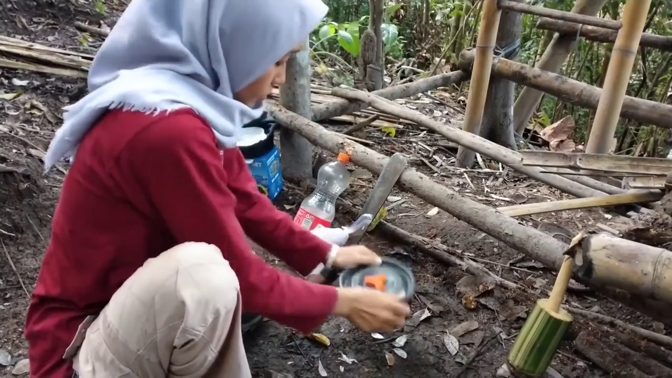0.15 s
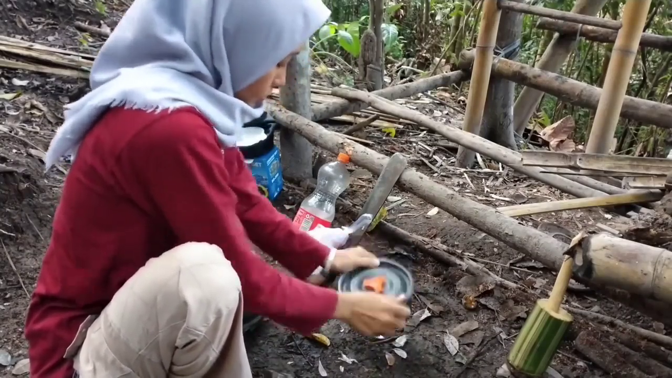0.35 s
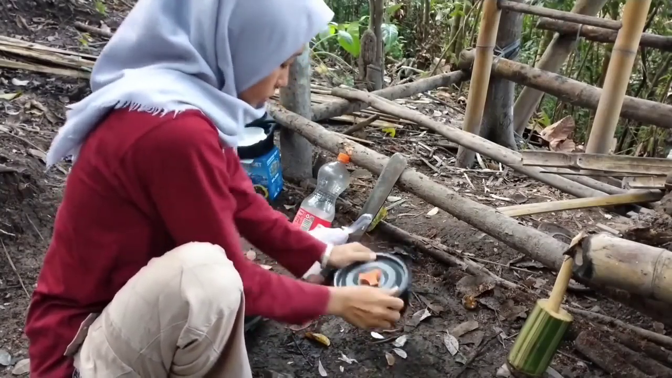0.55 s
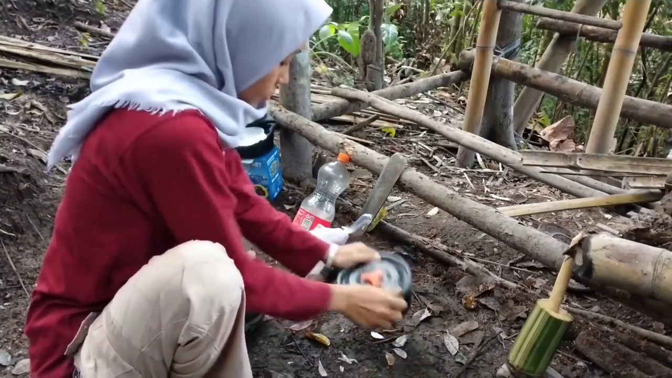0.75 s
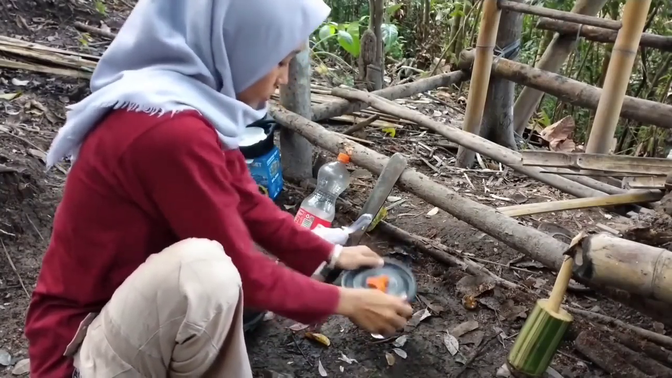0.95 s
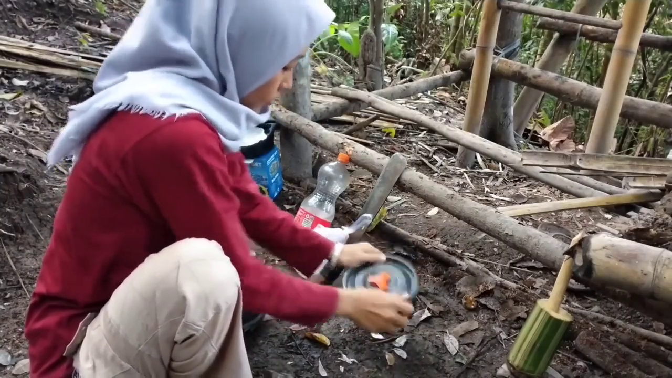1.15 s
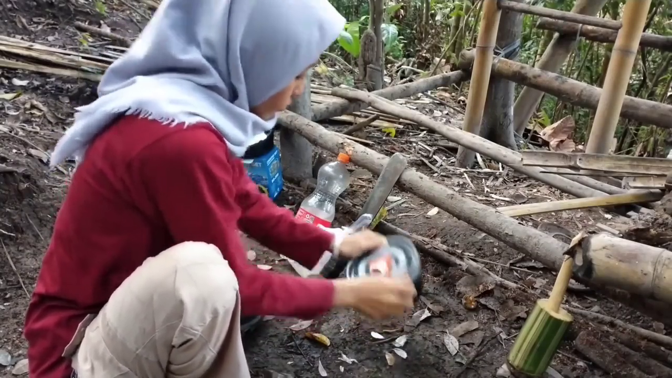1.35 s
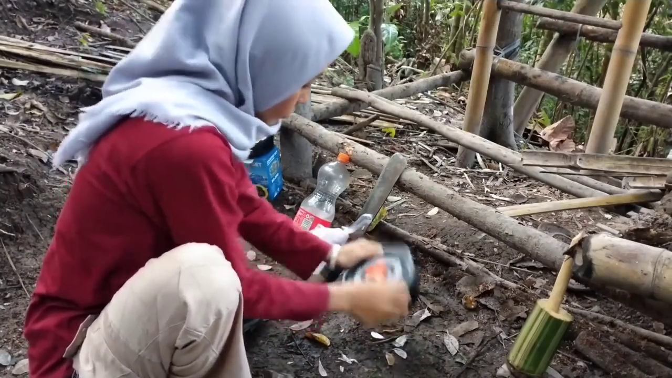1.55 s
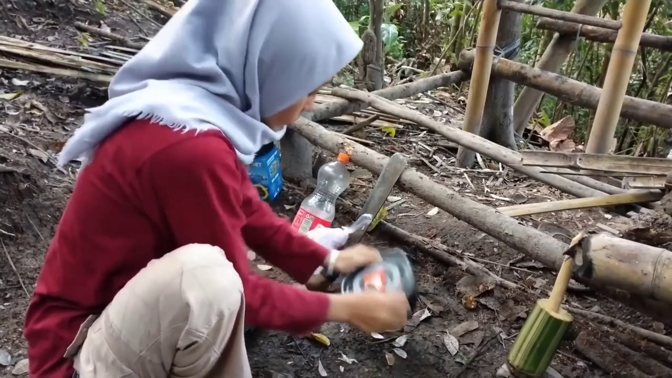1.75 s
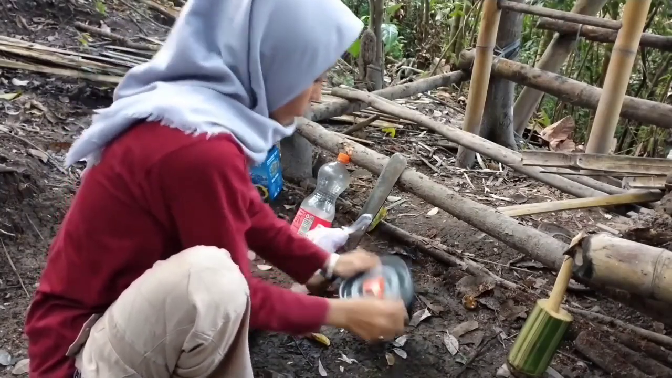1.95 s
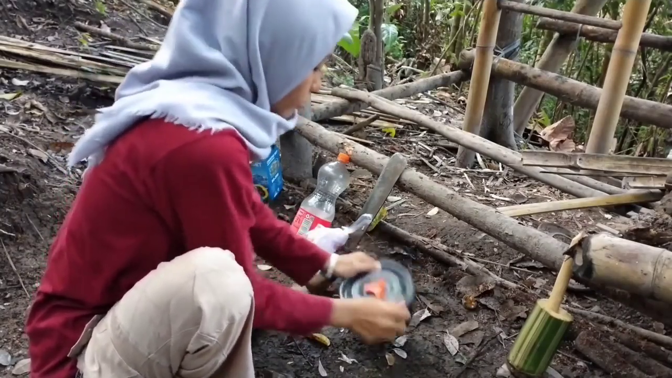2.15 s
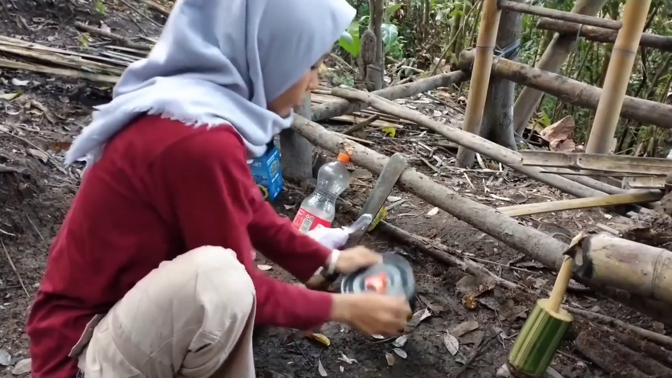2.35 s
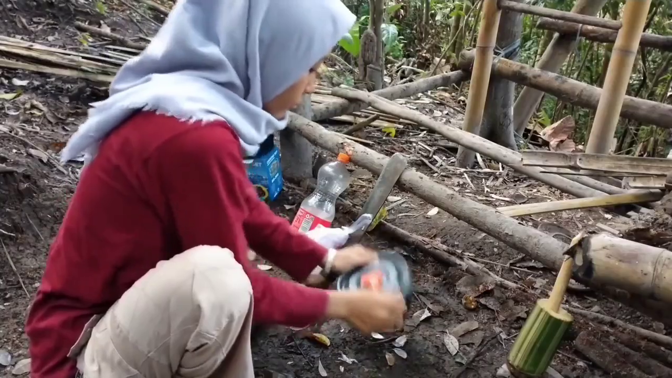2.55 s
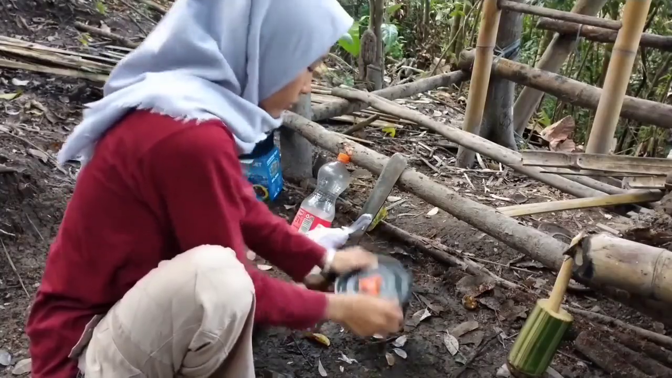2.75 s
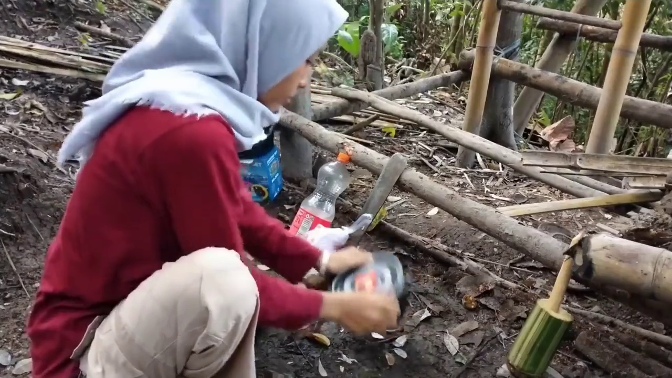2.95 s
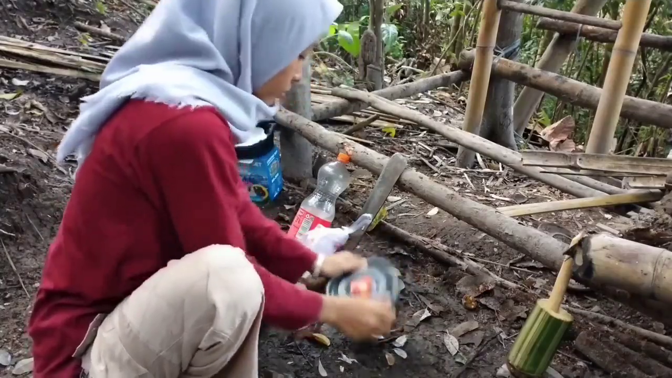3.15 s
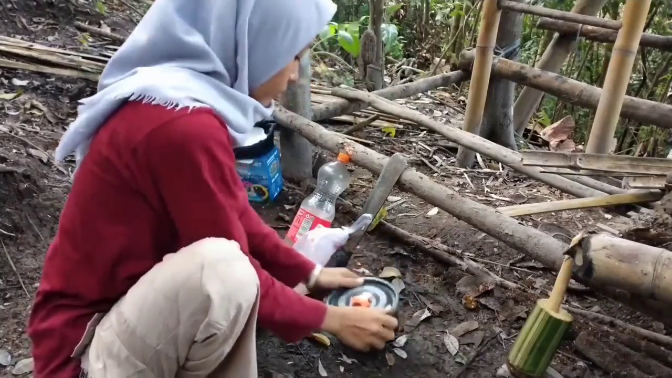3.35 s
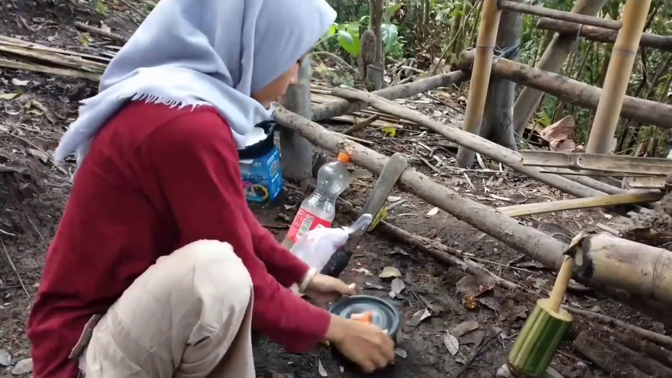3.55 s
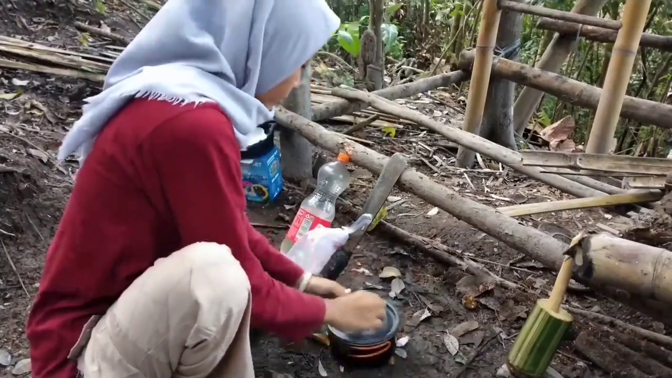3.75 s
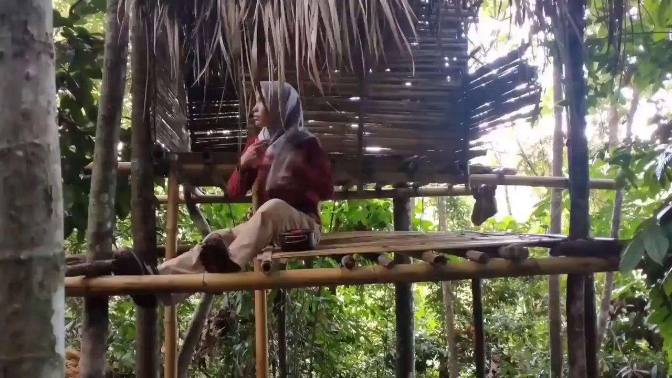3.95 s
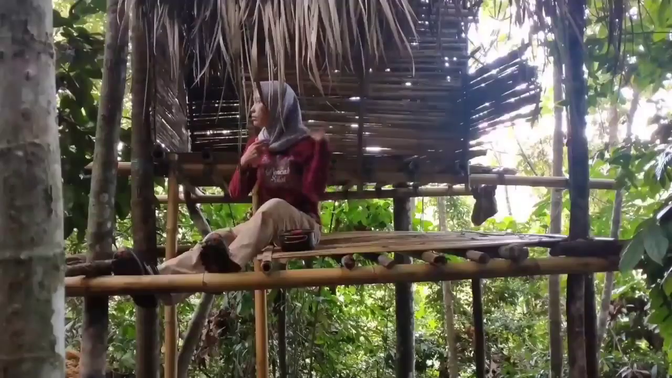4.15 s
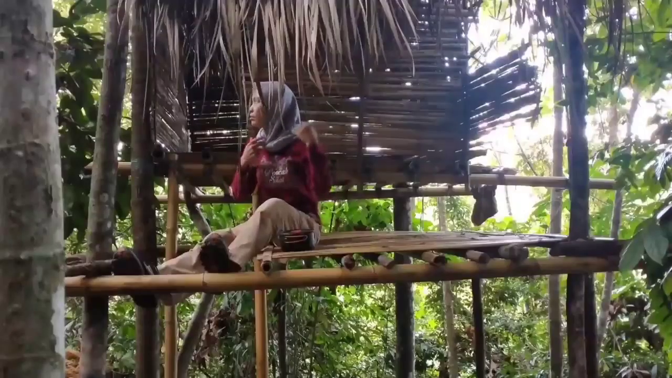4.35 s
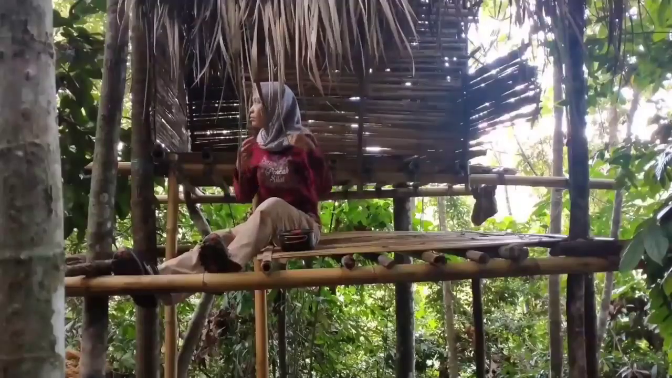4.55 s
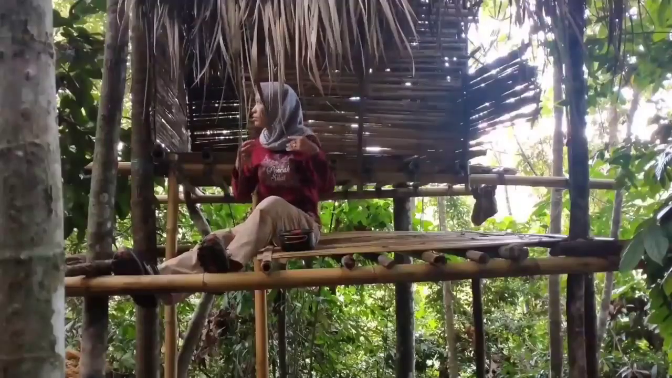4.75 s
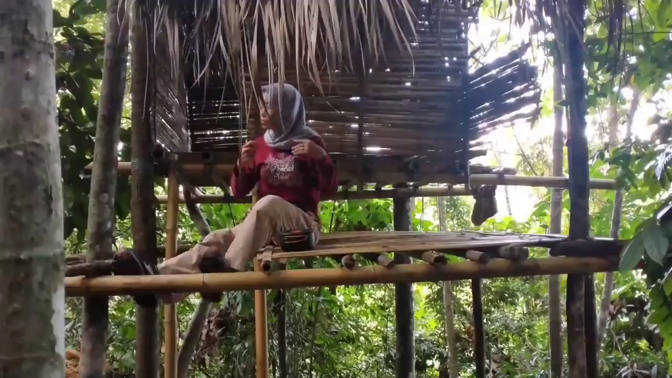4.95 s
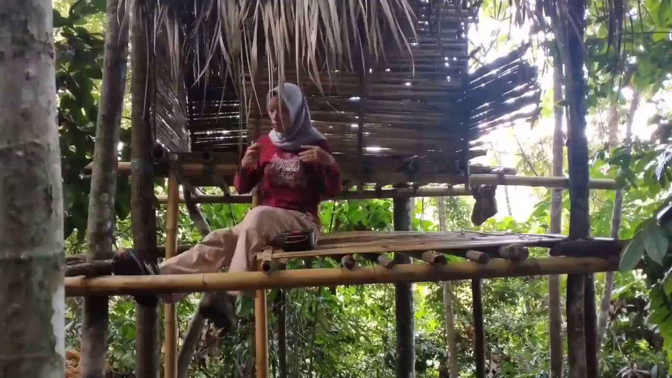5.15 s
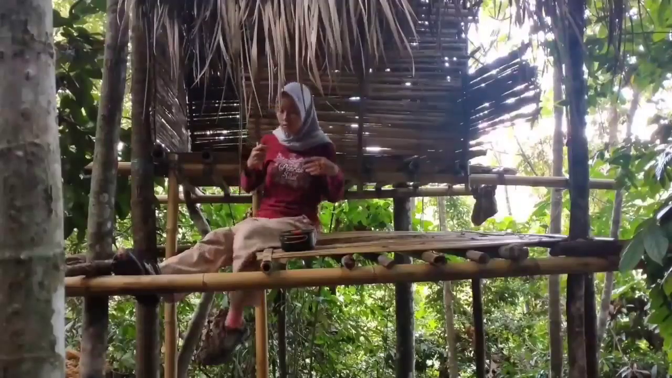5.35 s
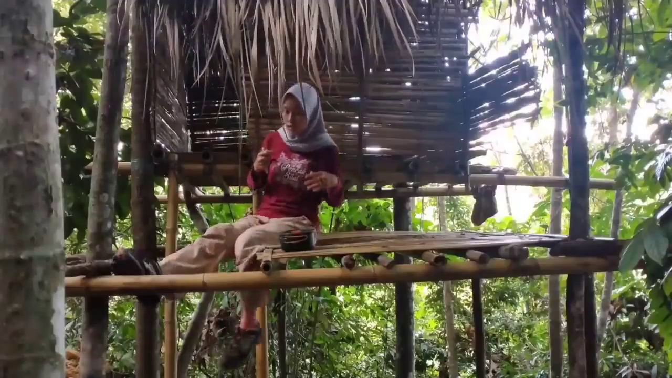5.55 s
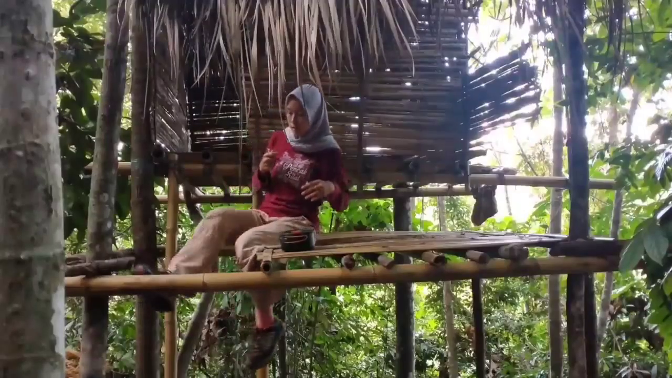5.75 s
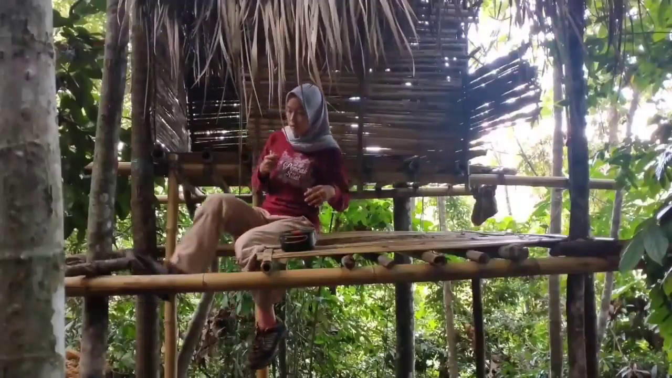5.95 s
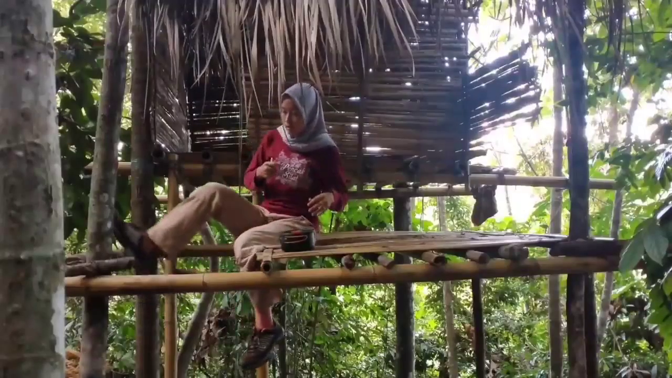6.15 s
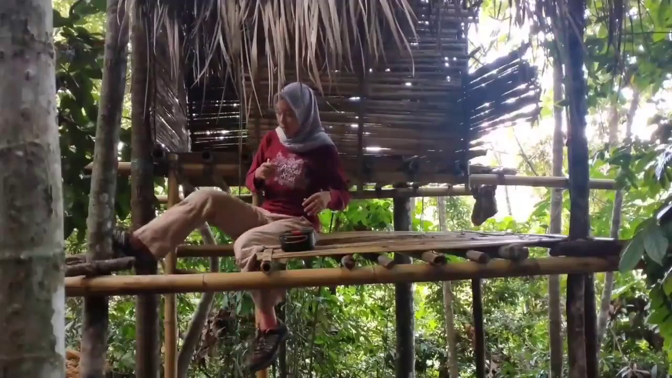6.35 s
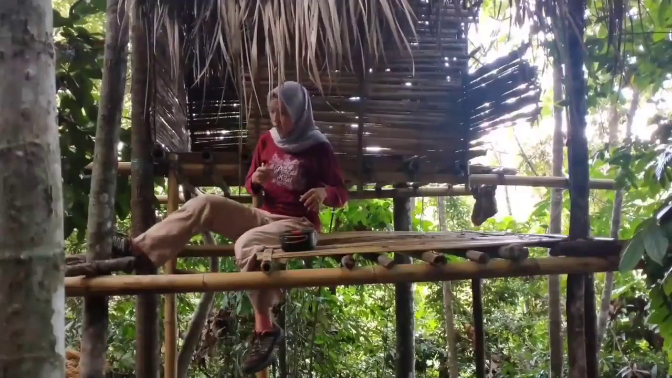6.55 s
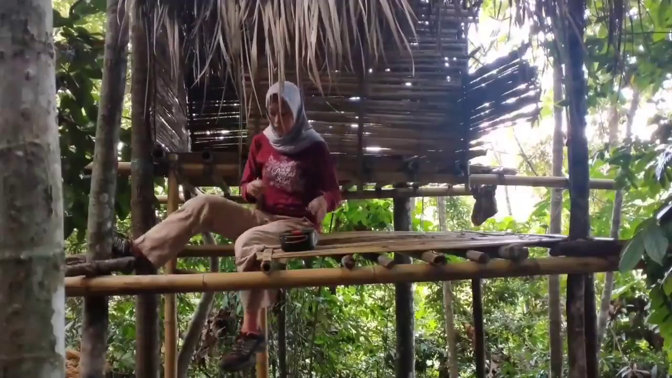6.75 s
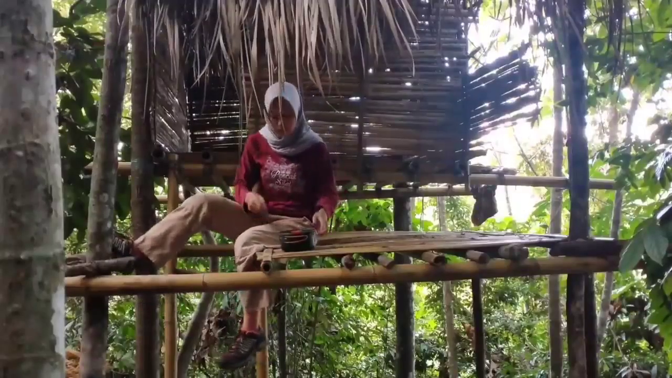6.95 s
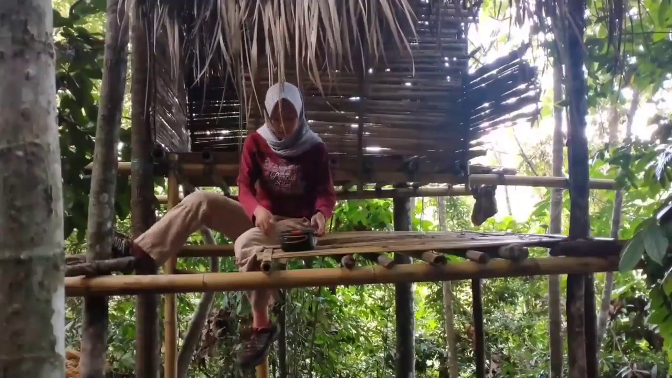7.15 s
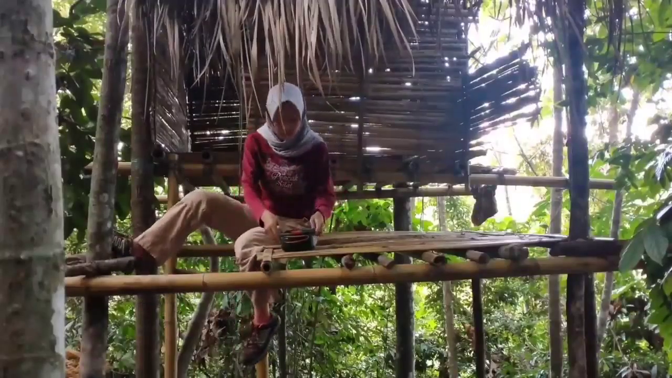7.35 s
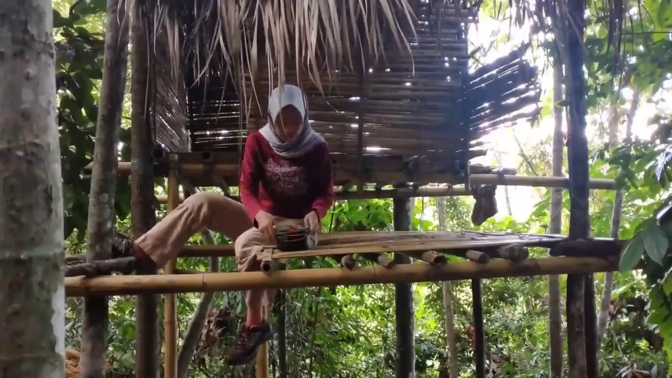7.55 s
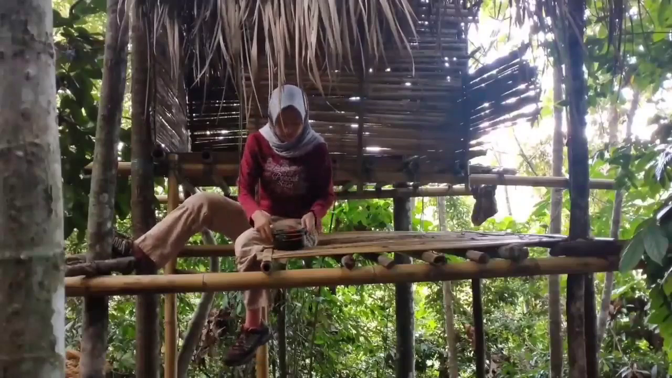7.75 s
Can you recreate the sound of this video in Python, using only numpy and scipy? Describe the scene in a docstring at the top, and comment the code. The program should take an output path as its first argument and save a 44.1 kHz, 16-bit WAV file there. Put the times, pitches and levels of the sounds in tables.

```python
"""Shaken metal pot in a cicada forest

Pieces of food strike the wall of a hand-held pot, ringing damped modes amid noise patter; the pot is then set down.
A bamboo floor knocks (sine plus noise puff) and creaks (slip rate with overtones).
Cicadas whine (three climbing sines) and buzz (lines of paired clicks); high chips are narrow noise bursts.
Bands of noise make a far shrill chorus, an insect haze, hissing leaves and a low rumble that steps down once."""
import sys
import numpy as np
from scipy import signal
from scipy.fft import rfft, irfft, next_fast_len
from scipy.io import wavfile
from scipy.ndimage import map_coordinates

SR = 44100
rng = np.random.default_rng(int(sys.argv[2]) if len(sys.argv) > 2 else 0)


def put_to_file(sound):
    """Save the sound as 16-bit audio at rate SR, in the file named by the first command-line argument."""
    columns = np.atleast_2d(sound).T  # one column per channel
    safe = np.clip(columns, -1, 1)
    whole_steps = np.round(safe * 32767)
    wavfile.write(sys.argv[1], SR, whole_steps.astype(np.int16))


N = 348373


def amp(db):
    """Amplitude factor of a level in dB."""
    return 10 ** (np.asarray(db) / 20)


def unit(x):
    """x scaled to rms 1."""
    return x / np.sqrt(np.mean(x ** 2) + 1e-20)


def along(points, hz):
    """(Hz, value) points on a log frequency axis."""
    f, v = np.transpose(points)
    return np.interp(np.log(hz + 1), np.log(f + 1), v)


def spectrum(points):
    """Amplitude response through (Hz, dB) points."""
    return lambda hz: amp(along(points, hz))


def curves(rows):
    """One value per sample for each column after the time in seconds."""
    s, *cols = np.transpose(rows)
    return [np.interp(np.arange(N) / SR, s, c) for c in cols]


def wobble(rate_hz, size=N):
    """A smooth random curve, rate_hz knots a second."""
    knots = rng.standard_normal(int(size * rate_hz / SR) + 4)
    return map_coordinates(knots, [np.arange(size) * rate_hz / SR])


def filtered(x, response):
    """x times a response of frequency."""
    m = next_fast_len(len(x) + 8192)
    return irfft(rfft(x, m) * response(np.fft.rfftfreq(m, 1 / SR)), m)[:len(x)]


def hiss(response, size=N):
    """Coloured noise of rms 1."""
    return unit(filtered(rng.standard_normal(size), response))


def add(track, s, sound):
    """Mix a sound in at s seconds."""
    at = track[max(round(s * SR), 0):][:len(sound)]
    at += sound[:len(at)]


def gate(size, rise_s, fall_s):
    """On for size samples, with linear ramps at both ends."""
    t = np.arange(size) / SR
    return np.clip(t / rise_s, 0, 1) * np.clip(t[::-1] / fall_s, 0, 1)


def onset(t, rise_s):
    """Exponential approach to 1 with time constant rise_s."""
    return 1 - np.exp(-t / rise_s)


def contacts():
    """Strikes of the loudest pieces on the pot wall, and a typically weaker piece landing a little after each."""
    # Each row: time in seconds, strength in relative dB, middle ring over it in dB, sharpness in dB.
    strikes = [(0.076, -33.5, 3.5, -0.5), (.129, -36, 7, -1), (.139, -35, 8, -4), (0.2804, -33, 0.5, -0.5),
               (.322, -47, -18, -20), (0.3341, -38, 7.5, 1), (.3431, -35.5, -10, -2),
               (0.4796, -33.5, 2.5, -1), (.537, -33.5, 7.5, 2.5), (0.6999, -37, -2.5, -1),
               (.7538, -42, 13, 0), (.764, -37, 6.5, -1), (0.9076, -34, -3, -8), (0.9648, -37.5, 8.5, 2),
               (1.103, -34.5, 5, -2), (1.1664, -36, 5.5, 0), (1.307, -36.5, -3, 1), (1.3256, -45, 5, 0),
               (1.3637, -38.5, 2.5, -4), (1.3691, -39.5, 9, 3), (1.5337, -35, 5, 0), (1.5825, -43.5, 15, 4),
               (1.5949, -36, -7, -6), (1.721, -33.5, -4.5, 2.5), (1.7791, -40, -1, -28),
               (1.7857, -41.5, 4, 7), (1.931, -35.5, -2, 6.5), (1.9906, -41, 9.5, 2.5),
               (2.1224, -32.5, -15, -8), (2.1379, -48, 7.5, -2), (2.1719, -50, 4, -8),
               (2.1783, -52.5, 22, 13), (2.1887, -38, 11.5, -19), (2.319, -37.5, -0.5, 1.5),
               (2.3713, -38, 8, -19), (2.384, -42.5, 12, 3), (2.5251, -31.5, -0.5, -1.5),
               (2.572, -45, 11, -14), (2.5795, -36, 11, -3), (2.7157, -35, -12, -3.5),
               (2.7295, -42, 0.5, -5), (2.783, -40, 10, 0.5), (2.8032, -46, 5, 0), (2.9181, -36, -6.5, 1.5),
               (2.9763, -38.5, 12, -17), (2.995, -36, 1.5, -28), (3.1365, -37, -0.5, 0),
               (3.1919, -37.5, 8, -3), (3.326, -33.5, -5, -1), (3.3773, -51, 8, 2),
               (3.3929, -37.5, -5, -40)]
    delay_s, delay_log_spread, late_db, scatter_db = 0.015, .4, -20, 5
    s, *levels = np.transpose(strikes)
    chance = rng.standard_normal((len(s), 4))
    late_levels = np.transpose(levels) + [late_db, 0, 0] + scatter_db * chance[:, 1:]
    late_s = s + delay_s * np.exp(delay_log_spread * chance[:, 0])
    return list(strikes) + list(np.column_stack([late_s, late_levels]))


def pot():
    """Each strike rings the wall modes at new strengths; smaller pieces patter around it."""
    # The pot, damped by two hands. Each row: nominal mode in Hz, relative level in dB, 60 dB decay in seconds.
    modes = [(269, -5, 0.042), (353, 2, 0.037), (513, -6.5, 0.098), (621.4, -3.5, 0.057), (770, 1, 0.038),
             (955, -6.5, 0.026), (1033, -9, 0.074), (1429, 4, 0.029), (1704, -2, 0.055), (2185, 1, 0.037),
             (2486, -14, 0.051)]
    # Levels over the strength; the upper ring takes a share of the sharpness.
    upper_over_db, upper_follows, tick_over_db, spit_over_db = -1, 0.13, -13, -8.5
    out, t = np.zeros(N), np.arange(SR // 8) / SR
    hz, level_db, t60_s = np.transpose(modes)[:, :, None]
    for s, low_db, middle_over_db, sharp_db in contacts():
        middle_db = low_db + middle_over_db
        upper_db = low_db + upper_over_db + upper_follows * sharp_db
        tick_db = low_db + tick_over_db + sharp_db
        spit_db = low_db + spit_over_db + sharp_db

        chance = rng.standard_normal((3, len(modes), 1))
        struck_db = np.where(hz < 580, low_db, np.where(hz < 1200, middle_db, upper_db))
        swing = np.sin(2 * np.pi * hz * (1 + 0.048 * chance[1]) * t + 0.83 * chance[2])
        decay = amp(struck_db + level_db + 2.6 * chance[0] - 60 * t / t60_s)
        ring = (decay * swing).sum(axis=0) * onset(t, 0.0027)

        patter_colour = [(150, low_db - 6), (350, low_db), (850, middle_db), (1800, upper_db - 1.5),
                         (3500, tick_db - 4.5), (12000, spit_db - 17.5)]
        grains = rng.standard_normal(len(t)) * amp(6 * wobble(500, size=len(t)))
        grains = unit(grains) * amp(-60 * t / 0.095) * onset(t, 0.0036)
        patter = filtered(grains, spectrum(patter_colour))

        tick_colour = [(2500, tick_db), (3800, tick_db + 3.5), (6000, tick_db - 10.5), (8500, tick_db),
                       (11000, spit_db - 13), (14500, spit_db - 2.5), (16000, spit_db + 5)]
        grit = rng.standard_normal(len(t)) * amp(4.2 * wobble(924, size=len(t)) - 60 * t / 0.066)
        tick = filtered(grit, spectrum(tick_colour))

        add(out, s - .0015, amp(2.0) * ring + amp(4.5) * tick)
        add(out, s - .006, amp(11.0) * patter)  # the first small pieces arrive ahead of the heavy one
    return out


def set_down():
    """Bright clacks of coloured noise with a fast decay and a weak slower tail."""
    # Each row: time in seconds, relative level in dB.
    hits = [(3.698, -18.5), (3.705, -24.5), (3.727, -34.5), (3.7516, -42)]
    # Each row: frequency in Hz, relative level in dB.
    colour = [(94, -41), (160, -15.5), (301, 1), (635, -29), (814, -12.5), (1110, -14), (1390, -8),
              (1820, -1.5), (2380, -18.5), (3620, -14.5), (4820, -29), (5210, -23), (6430, -30),
              (8400, -19.5), (15500, -39)]
    out, t = np.zeros(N), np.arange(SR // 4) / SR
    for s, db in hits:
        decay = amp(-60 * t / 0.039) + amp(-25.0 - 60 * t / 0.22)
        fade = decay * onset(t, 0.00017)
        add(out, s, amp(db - 0.5) * fade * hiss(spectrum(colour), size=len(t)))
    return filtered(out, lambda f: f ** 4 / (f ** 4 + 150 ** 4))  # high-pass at 150 Hz: no low thump


def bamboo():
    """Dull knocks, and one creak of a slipping joint whose slips give a short stack of overtones."""
    # Soft knocks. Each row: time in seconds, relative level in dB, pitch in Hz.
    knocks = [(4.019, -53.5, 410), (4.713, -48.5, 1350), (4.909, -50, 1260), (5.38, -46, 1190),
              (5.79, -63, 423), (6.199, -57, 1190), (6.319, -54, 1070), (6.591, -59, 350),
              (7.549, -47, 348), (7.639, -57, 417), (7.799, -49, 810), (7.828, -46, 800)]
    # Each row: time in seconds, mean slips per second, relative level in dB.
    creak = [(5.79, 460, -71), (5.846, 400, -67), (5.86, 440.0, -56.5), (5.882, 380, -53), (5.91, 400, -84)]
    decay_cycles = 35  # swings until a knock has died by 60 dB
    puff_colour = [(.3, -10), (.6, 0), (1, 5.5), (1.6, -6), (4, -5), (20, -30)]  # multiple of the pitch, dB
    out, t = np.zeros(N), np.arange(SR // 8) / SR
    for s, db, hz in knocks:
        puff = hiss(lambda f: amp(along(puff_colour, f / hz)), size=len(t))
        fade = amp(db + 3.0 - 60 * t * hz / decay_cycles) * onset(t, 0.001)
        add(out, s, fade * (120 / hz * np.sin(2 * np.pi * hz * t) + 0.43 * puff))

    rate_hz, db = curves(creak)
    phase = 2 * np.pi * np.cumsum(rate_hz * (1 + 0.047 * wobble(200))) / SR
    slips = np.sin(phase) + np.sin(2 * phase) + 0.66 * np.sin(3 * phase) + 0.27 * np.sin(4 * phase)
    rough = amp(db + 4.9 * wobble(300)) * slips
    a, b = round(creak[0][0] * SR), round(creak[-1][0] * SR)
    out[a:b] += rough[a:b] * gate(b - a, 0.011, 0.013)
    return out


def whines():
    """Clicks at a tenth of the pitch ring the drum: a strong line, a weak one either side, climbing together."""
    # Each row: start in seconds, end in seconds, first pitch in Hz, goal pitch in Hz, climb time constant in
    # seconds, drift in Hz per second, relative level at the middle in dB, change from start to end in dB.
    calls = [(0, .36, 2746, 2790, .12, 0, -53.5, -7), (.3, .7, 2876, 2930, .23, 40, -63, -3),
             (.62, 1.07, 2699, 2919, .084, 160, -48, -2), (1.17, 1.75, 2872, 2988, .088, 140, -60, -10),
             (1.37, 1.88, 2591, 2924, .067, 140, -52, 10), (2, 2.62, 2791, 2955, .256, -10, -57, 0),
             (2.62, 3.05, 2791, 2982, .115, -20, -55, 3), (3.3, 4.05, 2667, 2831, .47, 20, -54, -6),
             (3.92, 4.2, 2835, 2965, .29, 160, -62, -10), (4.42, 4.95, 2630, 2935, .049, 90, -58, -9),
             (4.55, 4.96, 2720, 2929, .083, -10, -50, -5), (4.8, 4.96, 2732, 2943, .075, 20, -59, 8),
             (4.97, 5.5, 2565, 2878, .047, 125, -50, -1), (5.41, 5.9, 2640, 2789, .02, 470, -53, -7),
             (5.62, 6.15, 2793, 2841, .12, 100, -62, 2), (5.9, 6.75, 2641, 2769, .08, 160, -64, -16),
             (6.15, 6.85, 2733, 2964, .062, 160, -51, -4), (6.75, 7.33, 2652, 2926, .081, 50, -54, -12),
             (7.4, 7.9, 2597, 2852, .083, 125, -60, 5)]
    arch_db, low_pitch_db = 1.5, -3  # middle over the ends; offset while the pitch is still low
    out = np.zeros(N)
    for start, end, first_hz, goal_hz, climb_s, drift_hz_per_s, db, change_db in calls:
        n = round((end - start) * SR)
        t = np.arange(n) / SR
        low = np.exp(-t / climb_s)
        pitch_hz = goal_hz - (goal_hz - first_hz) * low + drift_hz_per_s * t + 6 * wobble(70, size=n)
        click = 2 * np.pi * np.cumsum(pitch_hz) / SR / 10
        tone = np.sin(10 * click) + amp(-13) * np.sin(9 * click) + amp(-17.5) * np.sin(11 * click)
        place = t / t[-1]
        swell_db = db + low_pitch_db * low + change_db * (place - .5) - arch_db * (2 * place - 1) ** 2
        flutter_db = 2.5 * wobble(22, size=n) + 2 * wobble(60, size=n)
        add(out, start, amp(swell_db + flutter_db + 3.0) * gate(n, 0.0037, 0.08) * tone)
    return out


def buzzes():
    """Left and right drum click in turn; their lag decides which multiples of the rate stand out."""
    # Each row: start in seconds, end in seconds, click pairs per second, lag of the second click as a share
    # of the period, drum size factor, blur share 0-1, relative level in dB.
    calls = [(0, .98, 150, .5, 1, .95, -63), (1.03, 1.52, 156.34, .485, 1.02, .3, -57.5),
             (1.73, 2.36, 154.7, .485, 1, .3, -63), (2.64, 3.1, 145.34, .5, 1.03, .2, -63),
             (3.4, 4.13, 145.5, .5, .95, .8, -65), (4.2, 4.7, 142.24, .485, 1.15, .1, -69),
             (4.25, 4.66, 142.1, .5, .94, .1, -69), (4.9, 5.45, 145.38, .5, 1, .2, -57),
             (5.35, 5.9, 148.34, .5, .95, .3, -58), (5.42, 5.95, 141.4, .485, 1.02, .5, -59),
             (5.93, 6.27, 150.32, .49, 1, .2, -64), (6.27, 6.66, 141.86, .48, 1.15, .2, -66),
             (6.72, 7.41, 144.88, .4865, .95, .15, -58), (7.4, 7.9, 144.5, .5, 1, .3, -67)]
    # The buzzers' body at size 1. Each row: frequency in Hz, relative level in dB.
    body = [(2100, -28), (2400, -2), (2900, -10.5), (3150, -2), (3500, -17.5), (4250, -10.5), (4700, -6),
            (5100, 0.5), (5600, -8.5), (6100, -10), (7000, -10.5), (8200, -8), (9500, -41)]
    k = np.arange(14, 62)[:, None]  # multiples of the rate
    out = np.zeros(N)
    for start, end, rate_hz, lag, bulk, share, db in calls:
        n = round((end - start) * SR)
        t = np.arange(n) / SR
        phase = 2 * np.pi * np.cumsum(rate_hz + 0.082 * wobble(10.75, size=n)) / SR
        pair = np.abs(1 + .7 * np.exp(2j * np.pi * k * lag))  # second click at 0.7 of the first
        # each line fades on its own, about seven times a second
        knots = amp(2.5 * rng.standard_normal((len(k), int(7 * n / SR) + 2)))
        fading = np.array([np.interp(np.linspace(0, len(row) - 1, n), np.arange(len(row)), row)
                           for row in knots])
        strength = pair * amp(along(body, k * rate_hz * bulk)) * fading
        lines = (strength * np.sin(k * phase + 2 * rng.standard_normal(k.shape))).sum(axis=0)
        blur = hiss(lambda f: amp(along(body, f * bulk)), size=n)  # scattered by the trees
        # a short burst of noise flares 50 ms before the end
        flare = .45 * np.exp(-((t - (end - start) + .05) / .03) ** 2)
        swell = amp(db + 3.0 + 2.0 * wobble(10.36, size=n)) * gate(n, 0.017, 0.033)
        add(out, start, swell * ((1 - share) * unit(lines) + (share + flare) * blur))
    return out


def chips():
    """Short high rough notes: decaying noise in a band a few hundred hertz wide."""
    # Each row: time in seconds, relative level in dB, pitch in Hz.
    notes = [(0.5691, -48, 8540), (0.61, -47, 7500), (1.11, -40.5, 7020), (4.9294, -51, 6660),
             (5.4231, -46, 8530), (6.2094, -51, 8040), (6.2994, -50, 8000), (6.3294, -54, 9600),
             (6.7594, -46, 8000), (7.5494, -48, 8700), (7.6994, -46, 8160), (7.7694, -48, 9330),
             (7.7894, -44, 8400), (7.8194, -42, 8000)]
    out, t = np.zeros(N), np.arange(SR // 12) / SR
    for s, db, hz in notes:
        note = hiss(lambda f: 1 / (1 + ((f - hz) / 250) ** 2), size=len(t))
        add(out, s, amp(db - 5 - 60 * t / 0.074) * onset(t, 0.0015) * note)
    return out


def chorus():
    """Many singers near one pitch blur into bands; each overtone is spread in proportion."""
    # Each row: time in seconds, lowest band in dB, overtones in dB.
    levels = [(0, -57, -56), (.75, -62.5, -58), (.94, -60, -54.5), (1.78, -60, -54), (2.44, -57, -56.5),
              (3.06, -61, -60), (3.3, -57.5, -54), (3.89, -57.5, -53), (4.53, -59, -57.5),
              (4.88, -57.5, -58.5), (5.04, -60, -69), (5.21, -62, -56), (5.43, -63, -53.5), (5.9, -57, -52),
              (6.73, -54, -50.5), (7.9, -55, -50.5)]
    # Relative levels in dB of multiples 2 to 8.
    overtones_db = [-46, -17.5, -9.5, -8, 2, 1.5, 0]
    pitch_hz = 1848.4
    low_db, high_db = curves(levels)

    def band(f, k, width_hz):
        return 1 / (1 + ((f - k * pitch_hz) / (k * width_hz)) ** 2)

    low = hiss(lambda f: band(f, 0.97, 49)) * amp(0.6 * wobble(8.2) + 0.23 * wobble(35))
    high = hiss(lambda f: sum(amp(db) * band(f, k, 67) for k, db in enumerate(overtones_db, start=2)))
    high_flicker_db = 0.4 * wobble(6) + 0.74 * wobble(40)
    return amp(low_db) * unit(low) + amp(high_db + high_flicker_db) * high


def air():
    """Noise bands: leaves hiss softly, distant insects fill the middle, a rumble and a breeze's buffet lie below."""
    # Leaves' level. Each row: time in seconds, level in dB.
    leaves_level = [(0, -53), (.97, -54.5), (3.23, -50), (3.43, -54), (4.18, -58), (4.93, -52.5),
                    (6.42, -55.5), (7.57, -54.5), (7.79, -45.5), (7.9, -49.5)]
    # Leaves' colour. Each row: frequency in Hz, relative level in dB.
    leaves_colour = [(150, -17), (300, -2.5), (1000, -1.5), (2000, 1), (3500, -7), (4400, -3.5), (5200, -1),
                     (6300, -3), (10000, -1), (15500, 5)]
    # Insect haze level. Each row: time in seconds, level in dB.
    haze_level = [(0, -58.5), (1.12, -58.5), (1.54, -55), (1.8, -58), (3.94, -57.5), (4.33, -64),
                  (4.6, -57), (5.3, -56), (6.29, -58), (7.9, -57)]
    # Insect haze colour. Each row: frequency in Hz, relative level in dB.
    haze_colour = [(1450, -39), (1700, -5.5), (1950, -0.5), (2070, 3.5), (2200, -4), (2600, -6), (2950, 1),
                   (3200, -17), (3600, -3.5), (4200, -20)]
    # Rumble colour. Each row: frequency in Hz, relative level in dB.
    rumble_colour = [(30, -15), (55, -3.5), (120, -3.5), (220, -9.5), (350, -17.5), (600, -50)]
    # Breeze buffet colour. Each row: frequency in Hz, relative level in dB.
    buffet_colour = [(8, 1), (15, 0), (30, -24), (50, -10), (90, -68)]
    # the rumble steps down 7.5 dB at 4.05-4.1 s
    rumble_db = np.interp(np.arange(N) / SR, (4.05, 4.1), (-65, -72.5))
    leaves = amp(curves(leaves_level)[0] + wobble(4)) * hiss(spectrum(leaves_colour))
    haze = amp(curves(haze_level)[0] + 0.9 * wobble(15)) * hiss(spectrum(haze_colour))
    rumble = amp(rumble_db + 0.54 * wobble(3.58)) * hiss(spectrum(rumble_colour))
    buffet = amp(-61 + 0.94 * wobble(1.48)) * hiss(spectrum(buffet_colour))
    return leaves + haze + rumble + buffet


def trees(x, t60_s, wet_db):
    """A short diffuse answer from trunks and ground: convolution with decaying noise."""
    t = np.arange(SR // 2) / SR
    tail = rng.standard_normal(len(t)) * amp(-60 * t / t60_s)
    return x + amp(wet_db) * signal.fftconvolve(x, tail / np.linalg.norm(tail))[:N]


def scene():
    """Pot and bamboo close by, insects with more reverberation, chorus and air behind."""
    near = trees(pot() + set_down() + bamboo(), t60_s=0.24, wet_db=-15)
    far = trees(whines(), t60_s=0.75, wet_db=-5)
    far = far + trees(buzzes() + chips(), t60_s=1.0, wet_db=-8)
    return (near + far + chorus() + air())[None]


def record(dry):
    """Band limit: a steep cut around top_hz, 105 dB down 300 Hz above it."""
    top_hz = 15520
    return filtered(dry[0], lambda hz: amp(-70 * np.clip((hz - top_hz) / 250 + .3, 0, 1.5)))[None]


dry = scene()
out = record(dry)
put_to_file(out)
```